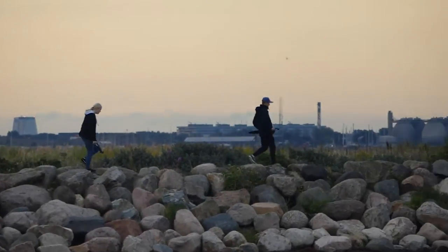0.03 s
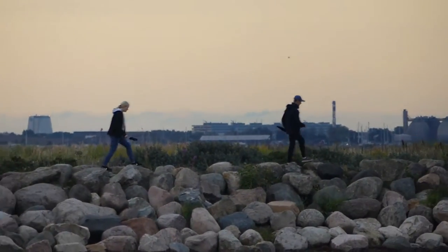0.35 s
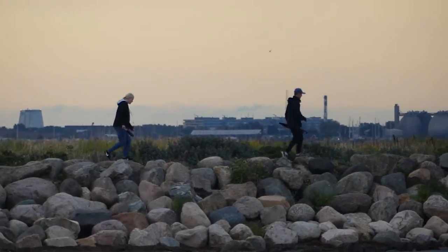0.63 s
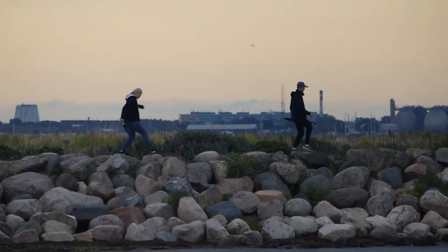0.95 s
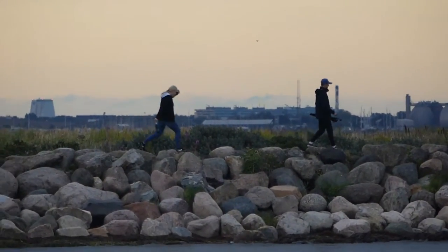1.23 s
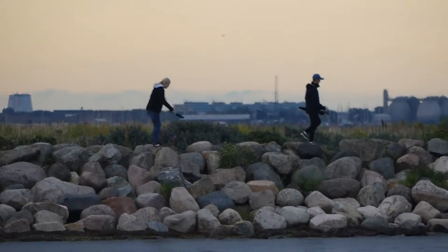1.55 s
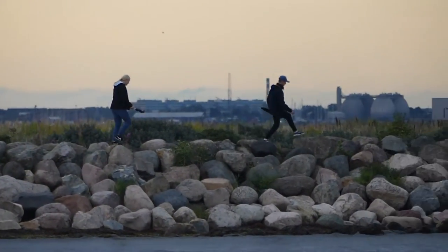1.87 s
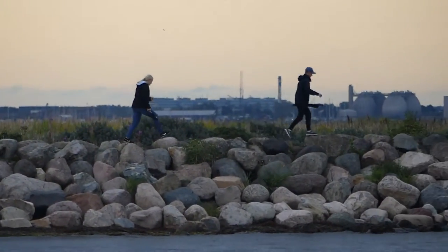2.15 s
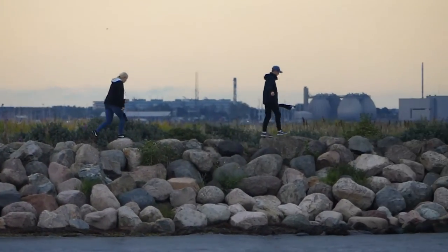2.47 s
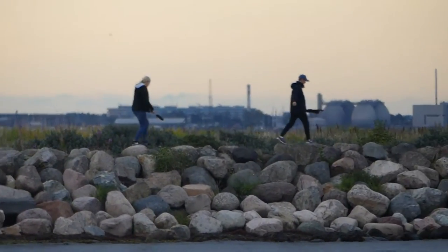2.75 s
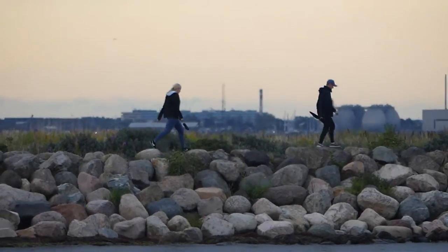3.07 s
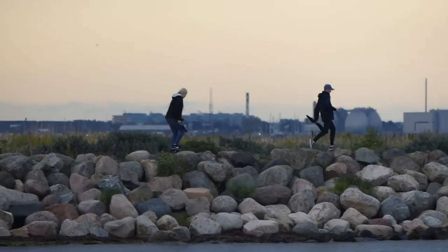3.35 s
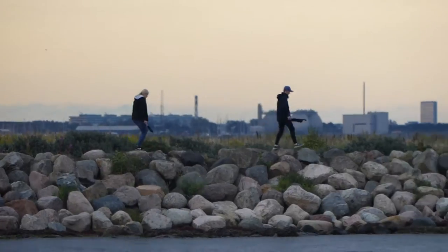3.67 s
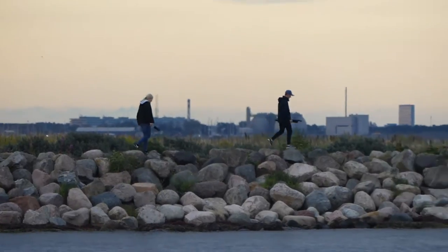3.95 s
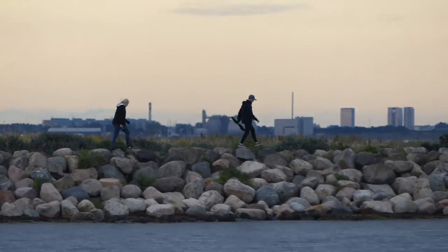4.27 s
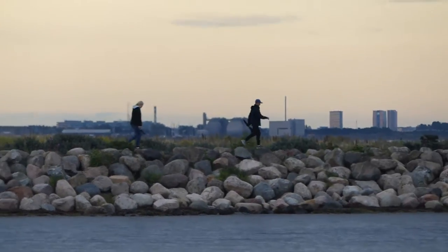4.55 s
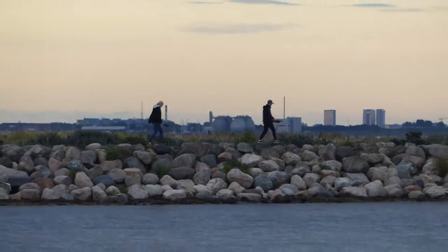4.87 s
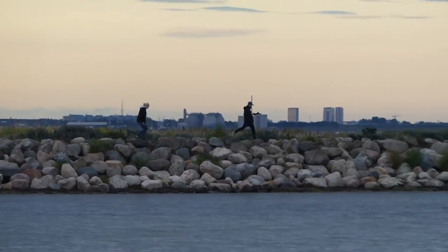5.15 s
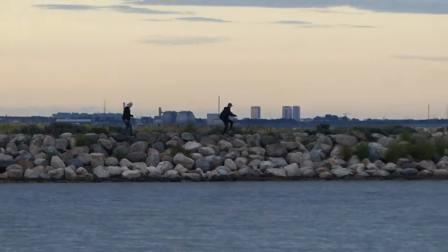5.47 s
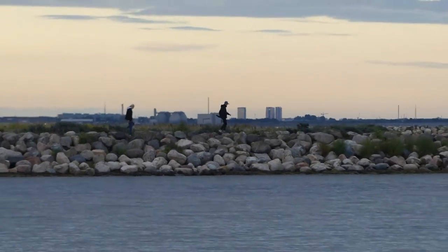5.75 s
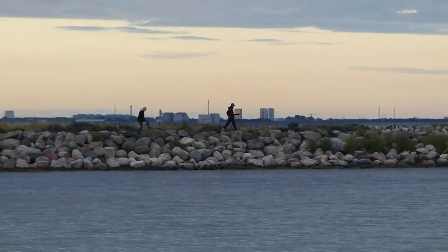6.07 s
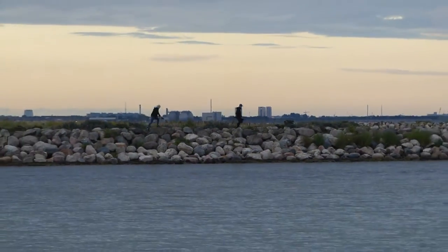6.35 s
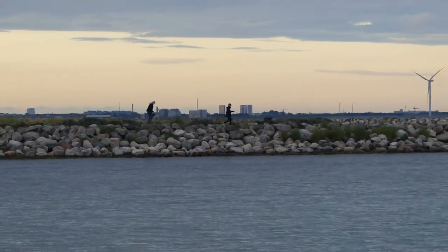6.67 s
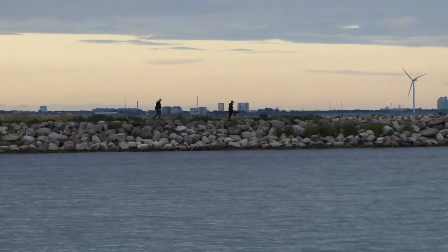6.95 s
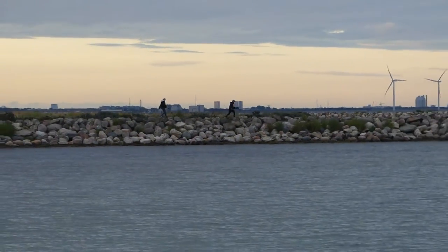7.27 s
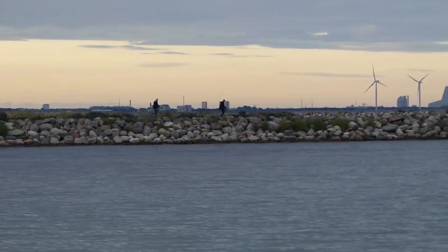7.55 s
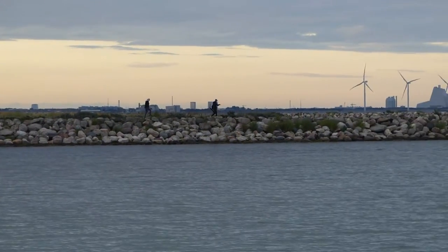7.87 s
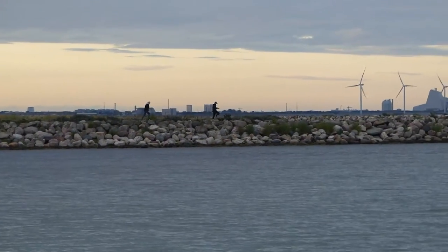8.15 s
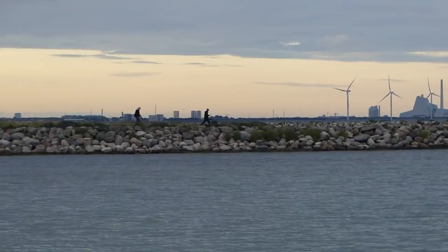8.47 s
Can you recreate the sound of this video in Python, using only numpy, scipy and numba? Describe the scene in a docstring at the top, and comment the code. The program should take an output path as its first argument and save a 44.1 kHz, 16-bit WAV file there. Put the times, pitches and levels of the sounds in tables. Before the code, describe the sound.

Gusty wind rumbles on the microphone over scattered raspy gull calls, faint lapping water and a soft zoom motor whirr.

```python
"""Gulls calling over a stony shore, heard from a hand-held camera with two microphone ports.
Each call is a creaky rasp of the syrinx; five of them break into a clear whistle in the middle.
Small waves wash the stones behind the birds. Right at the microphone, gusts buffet the ports and
sing faintly on an edge, the ports hiss, and the zoom motor ticks as the lens pulls back."""
import sys
import numpy as np
from scipy import signal
from scipy.fft import rfft, irfft, next_fast_len
from scipy.io import wavfile
from scipy.ndimage import uniform_filter1d, map_coordinates
from numba import njit

SR = 44100
rng = np.random.default_rng(int(sys.argv[2]) if len(sys.argv) > 2 else 0)


def persist_wave(psi):
    """Save psi, clipped to +-1, as 16-bit WAV."""
    counts = np.round(np.clip(psi, -1, 1) * 32767).astype(np.int16)
    wavfile.write(sys.argv[1], SR, np.atleast_2d(counts).T)


N = 379701
TIME = np.arange(N) / SR

# Water on the stones. Each row: frequency in Hz, relative density in dB.
WATER_SPECTRUM = [(150, -40), (400, 1), (560, -1), (750, 3), (1000, 3), (1300, -3), (1700, -9.5),
                  (2300, -17.5), (3200, -32.5), (5000, -30.5)]
# The slow swell of the water. Each row: time in seconds, relative level in dB.
WATER_SWELL = [(0, -47.5), (1.5, -48.5), (2.6, -48), (4.3, -51), (6.2, -51.5), (8, -51)]
# The microphone's own hiss. Each row: frequency in Hz, relative density in dB.
HISS_SPECTRUM = [(3000, 4.5), (4700, -3), (6200, 2), (7400, -4), (8500, 0.5), (9800, 4), (12500, -0.5),
                 (16000, -2)]
# Wind on the ports. Each row: frequency in Hz, relative density in dB.
WIND_SPECTRUM = [(22, -49), (35, -25), (60, -3.5), (115, 3.5), (170, 1), (250, -12.5), (350, -20),
                 (500, -32.5), (800, -52), (2000, -82)]
# Gusts at the microphone. Each row: peak time, rise and fall in seconds, relative level in dB.
WIND_GUSTS = [(0.08, 0.042, 0.076, -39.5), (1.55, 0.67, 0.96, -28.5), (2.85, 0.18, 1, -35),
              (4.38, 0.45, 0.38, -25), (5.12, 0.074, 0.21, -30.5), (5.81, 0.041, 0.036, -30.5),
              (6.08, 0.098, 0.19, -36), (6.35, 0.013, 0.063, -39.5), (7.7, 0.52, 0.49, -29),
              (8.28, 0.083, 0.067, -30.5)]
# Calls that stay creaky. Each row: peak time, rise and fall in seconds, flap rate in Hz, relative
# level in dB, beak over throat in dB, beak resonance in Hz, roughness from 0 to 1, beak gain from
# peak to end in dB, pitch glide as a share per second, throat resonance and its width in Hz,
# windpipe over throat in dB, beak width in Hz.
CREAKY_CALLS = [(0.118, 0.074, 0.071, 240, -40, -4.5, 3350, 0.57, 0, -.2, 1310, 340, -30, 1200),
                (0.187, 0.039, 0.041, 237, -38.5, -4.5, 3480, 0.6, 1, -0.15, 1320, 340, -23, 1400),
                (0.298, 0.045, 0.028, 229, -37, -7, 3460, 0.4, -2, -0.39, 1280, 260, -13, 755),
                (2.129, .012, 0.02, 230.6, -48, -2.5, 4200, 0.85, -4, 0, 1380, 380, -16, 1900),
                (2.812, 0.042, 0.048, 209, -38.5, -16.5, 2615, 0.42, 0, 0.52, 1340, 474, -30, 150),
                (2.865, 0.048, 0.13, 252.6, -44.5, -23, 4370, 0.13, -2, 0.2, 1600, 330, -31, 600),
                (3.122, 0.022, 0.015, 245.6, -46, -15, 3320, 0.2, 5, 0.16, 1450, 380, -27, 1000),
                (3.155, 0.035, 0.05, 250, -43.5, -15.5, 3920, 0.24, -6, -0.16, 1490, 380, -24, 330),
                (4.808, 0.11, 0.072, 236.4, -37.5, -3.5, 3100, 0.14, 7, -0.21, 1380, 283, -11, 360),
                (4.877, 0.037, 0.039, 231.6, -42, 1, 3350, 0.36, -3, -1.53, 1290, 300, -1, 600),
                (5.561, 0.065, 0.095, 219.7, -51, -6, 3420, 0.6, -1, 0.2, 1290, 380, -11, 700),
                (6.972, 0.047, 0.078, 233.3, -46.5, -21, 3300, 0.15, 2, 0.097, 1220, 380, -14, 470)]
# The clear whistle in each of the five cries, one list a cry. Each row: time in seconds, pitch in Hz,
# relative levels of the fundamental and of the overtones in dB.
WHISTLE_CONTOURS = [
    [(.51, 1142, -44, -57), (.53, 1119, -42, -56), (.555, 1157, -56, -44), (.578, 1199, -42, -52),
     (.595, 1184, -53, -45), (.637, 1192, -47, -44.5), (.657, 1150, -52, -55)],
    [(1.98, 1158, -43, -55), (2.02, 1130, -39.5, -52.5), (2.05, 1153, -40.5, -45.5),
     (2.085, 1141, -36.5, -47.5), (2.112, 1153, -40, -38), (2.127, 1203, -41, -60)],
    [(3.426, 1145, -51, -56), (3.455, 1143, -49, -55), (3.485, 1130, -47, -54), (3.503, 1155, -46, -71),
     (3.53, 1152, -45, -59), (3.565, 1177, -42.5, -58), (3.6, 1144, -52, -71)],
    [(5.34, 1126, -56, -70), (5.40, 1155, -45, -61.5), (5.44, 1150, -45, -59.5), (5.47, 1134, -47, -64),
     (5.492, 1093, -66, -67)],
    [(7.5, 1108, -49, -56), (7.53, 1126, -36, -47), (7.565, 1140, -38, -42), (7.595, 1144, -41.5, -43.5),
     (7.619, 1123, -40, -43.5), (7.64, 1060, -47, -52)],
]
# The voices of the same five cries. Each row: second and fourth harmonic over the third in dB,
# brightening from middle to end in dB per harmonic, tremble from 0 to 1, relative level of the
# opening rasp in dB, its rise in seconds, relative level of the closing rasp in dB.
CRY_VOICES = [(1, -43, 0.5, 0.27, -39.5, 0.055, -40.5), (-7.5, -11.5, 3.5, 0.03, -40.5, 0.037, -43),
              (0.5, -14, -3, 0.3, -43, .04, -52), (1.5, -10, -4, 0.72, -51.5, .03, -56),
              (-3, -22, 7, 0.1, -37.5, .054, -43.5)]
# The hardest single buffets. Each row: peak time in seconds, relative level in dB, pitch in Hz.
HARD_BUFFETS = [(1.243, -21.5, 190), (1.303, -18.5, 223), (1.325, -21, 170), (1.469, -18.5, 290),
                (1.637, -17.5, 157), (1.79, -16, 135), (1.805, -19, 149), (2.864, -18.5, 167),
                (3.117, -16, 151), (3.807, -17.5, 150), (4.18, -21, 210), (4.238, -21.5, 210),
                (4.303, -16.5, 175), (4.392, -18.5, 238), (4.503, -14.5, 135), (4.62, -18.5, 217),
                (6.095, -21, 160), (6.181, -19, 164), (6.365, -24.5, 124), (7.572, -18.5, 169),
                (7.968, -19.5, 152)]
# Thin edge tones in the three strongest gusts. Each row: peak time, rise and fall in seconds,
# pitch in Hz, glide in Hz per second, relative level in dB.
EDGE_TONES = [(1.38, .18, 0.46, 1900, -500, -60), (4.19, 0.071, 0.33, 1807, 1900, -59),
              (7.8, 0.3, 0.31, 1885, -500, -62.5)]
# The camera body shades the right port. Each row: frequency in Hz, left minus right in dB.
BODY_SHADE = [(110, 0), (170, -0.5), (290, 6.5), (700, 2.5), (1250, 10), (2350, 9.5), (3400, 7), (5000, 5)]


def undb(db):
    """Decibels to gain."""
    return 10 ** (np.asarray(db) / 20)


def level(x, db=0):
    """Scale to an rms level."""
    return x * undb(db) / np.sqrt(np.mean(x ** 2))


def curves(rows, t=TIME):
    """Each column of a table, joined by straight lines in time."""
    times, *columns = np.transpose(rows)
    return [np.interp(t, times, column) for column in columns]


def colour(x, points, share=1):
    """Filter by a spectrum of (Hz, dB) points, or by a share of its dB."""
    hz, db = np.transpose(points)
    size = next_fast_len(N + 4096)
    bins_hz = np.maximum(np.fft.rfftfreq(size, 1 / SR), 1)
    gain = undb(share * np.interp(np.log(bins_hz), np.log(hz), db))
    return irfft(rfft(x, size) * gain, size)[..., :N]


def noise(points):
    """Coloured noise of rms 1."""
    return level(colour(rng.standard_normal(N), points))


def walk(rate, t=TIME):
    """Smooth random drift of spread near 1, with rate new values a second."""
    return map_coordinates(rng.standard_normal(4096), [t * rate], order=3, mode="wrap")


def add(track, s, sound):
    """Mix a sound into a track from time s."""
    i = max(int(s * SR), 0)
    track[i:i + len(sound)] += sound[:N - i]


def spread(mid, side, side_db):
    """Left and right from a shared part and a side part."""
    return mid + undb(side_db) * np.array([side, -side])


def bell(peak_s, rise_s, fall_s):
    """Power that swells to 1 and dies away."""
    return np.exp(-((TIME - peak_s) / np.where(TIME < peak_s, rise_s, fall_s)) ** 2)


def hump(hz, centre_hz, width_hz, order=2):
    """Gain of a resonance; a higher order has steeper sides."""
    return (1 + 4 / order * ((hz - centre_hz) / width_hz) ** 2) ** -order


@njit
def bandpass(x, hz, width_hz):
    """State-variable band-pass with a moving centre."""
    y, band, low = np.empty(len(x)), 0., 0.
    for i in range(len(x)):
        g, damping = np.tan(np.pi * hz[i] / SR), width_hz / hz[i]
        v = (band + g * (x[i] - low)) / (1 + g * (g + damping))
        band, low, y[i] = 2 * v - band, low + 2 * g * v, damping * v
    return y


def water():
    """Behind the birds, small waves wash on the stones, swelling slowly and flickering."""
    swell = undb(curves(WATER_SWELL)[0] + .5 * walk(6.3) + 1.54 * walk(22))
    return spread(noise(WATER_SPECTRUM), noise(WATER_SPECTRUM), -7) * swell


def microphone_hiss():
    """A faint, steady hiss, partly different at each port."""
    return undb(-63) * spread(noise(HISS_SPECTRUM), noise(HISS_SPECTRUM), -3)


def wind_strength(breeze_db=-46.5):
    """Wind at the camera in dB: the gusts add up over a steady breeze."""
    gusts = sum(undb(db) ** 2 * bell(*timing) for *timing, db in WIND_GUSTS)
    return 10 * np.log10(undb(breeze_db) ** 2 + gusts)


def wind(gust_db, strong_gust_db=-33.5):
    """Large eddies rumble and small ones flap; the left channel lags in phase, widening the wind."""
    large = colour(noise(WIND_SPECTRUM), [(120, -3), (260, -13)]) * undb(1.5 * walk(38))
    small = colour(noise(WIND_SPECTRUM), [(90, -20), (220, -1)]) * undb(4.5 * walk(65))
    rumble_gain = undb(.27 * (strong_gust_db - gust_db))  # rumble grows more slowly than the wind
    eddies = (rumble_gain * large + small) / np.std(large + small)
    shared = eddies * undb(gust_db + .1) + buffets()
    side = colour(shared, [(25, -4), (60, -17.5), (130, -7.5), (280, -6)])
    lagging = np.imag(signal.hilbert(side))  # a quarter cycle behind
    unrelated = colour(noise(WIND_SPECTRUM), [(100, -16), (200, -14), (400, 4.5)]) * undb(gust_db)
    return spread(shared, lagging + unrelated, 0)


def rasp(peak_s, rise_s, fall_s, flap_hz, db, beak_db, beak_hz, rough, opening_db=0, glide=0,
         throat_hz=1290, throat_width_hz=380, windpipe_db=-13, beak_width_hz=620):
    """A gull's flapping syrinx rings its throat, windpipe and beak. Gives (start in seconds, sound)."""
    k = np.arange(3, 25)[:, None]  # harmonic numbers
    t = np.arange(-rise_s, fall_s, 1 / SR)
    clock = peak_s + t
    progress = np.interp(t, [-rise_s, 0, fall_s], [-1, 0, 1])
    arch = 1 + glide * t - 11 * t ** 2
    bend = arch * (1 + .021 * rough * walk(150, clock))
    hz = flap_hz * bend
    phase = 2 * np.pi * np.cumsum(hz) / SR
    # no two flaps are alike, so every harmonic wavers in size and phase on its own
    wavering = np.array([undb(3.4 * walk(35, clock)) + rough * (walk(200, clock) + 1j * walk(200, clock))
                         for _ in k])
    harmonics = np.real(wavering * np.exp(1j * (k * phase + .0633 * k ** 2)))
    # the throat and both beak resonances follow the pitch; the windpipe stays put
    throat = hump(k * hz, throat_hz * bend, throat_width_hz, order=1)
    windpipe = undb(windpipe_db) * hump(k * hz, 2430, 230)
    beak = hump(k * hz, beak_hz * bend, beak_width_hz)
    beak += undb(-21) * hump(k * hz, 1.3 * beak_hz * bend, 2 * beak_width_hz)
    voice = level(((throat + windpipe) * harmonics).sum(0))
    voice += level((beak * harmonics).sum(0), beak_db + opening_db * progress)  # louder when open
    swell = undb(-11 * progress ** 2) * signal.windows.tukey(len(t), .25)
    return peak_s - rise_s, undb(db) * swell * voice


def creaky_calls():
    """The gull calls that rasp from start to end."""
    out = np.zeros(N)
    for call in CREAKY_CALLS:
        add(out, *rasp(*call))
    return out


def boulder_scatter(x, wet_db=-22, t60_s=.5):
    """The boulders throw a faint, diffuse tail back to the microphone."""
    t = TIME[:SR // 2]
    tails = rng.standard_normal((2, len(t))) * np.exp(-np.log(1000) * t / t60_s)
    echoes = [signal.fftconvolve(x, tail / np.linalg.norm(tail))[:N] for tail in tails]
    return x + undb(wet_db) * np.array(echoes)


def whistle(contour, second_db, fourth_db, brighten_db, tremble, fade_s=.0055):
    """The syrinx locks into one trembling tone of four harmonics. Gives (start in seconds, sound)."""
    t = np.arange(contour[0][0], contour[-1][0], 1 / SR)
    pitch_hz, fundamental_db, third_db = curves(contour, t)
    tilt_db = brighten_db * np.linspace(-1, 1, len(t))
    phase = 2 * np.pi * np.cumsum(pitch_hz * (1 + .016 * tremble * walk(230, t))) / SR
    levels_db = [fundamental_db, third_db + second_db - tilt_db,
                 third_db, third_db + fourth_db + tilt_db]
    tone = np.zeros(len(t))
    for k, db in enumerate(levels_db, 1):
        shimmer_db = 2 * walk(45, t) + 3.5 * tremble * walk(150, t)
        tone += undb(db + shimmer_db) * np.sin(k * phase)
    fade = np.minimum(np.minimum(t - t[0], t[-1] - t) / fade_s, 1)
    return t[0], np.sqrt(2) * tone * fade


def cries(hoarse_db=-15):
    """Each cry opens with a rasp, whistles over a faint hoarseness and falls back into a softer rasp."""
    whistles, creaks = np.zeros(N), np.zeros(N)
    for contour, (*timbre, rasp_db, rise_s, closing_db) in zip(WHISTLE_CONTOURS, CRY_VOICES):
        start, end = contour[0][0], contour[-1][0]
        half = (end - start) / 2
        # the whistle sits near the fifth harmonic of the flapping
        flap_hz = .202 * np.mean([point[1] for point in contour])
        add(whistles, *whistle(contour, *timbre))
        add(creaks, *rasp(start + .004, rise_s, .031, flap_hz, rasp_db,
                          beak_db=-8.5, beak_hz=3130, rough=.47, beak_width_hz=960, windpipe_db=-13.5))
        add(creaks, *rasp(start + half, half, half, flap_hz, rasp_db + hoarse_db,
                          beak_db=-3.5, beak_hz=3270, rough=.92))
        add(creaks, *rasp(end, .024, .044, flap_hz, closing_db,
                          beak_db=-4, beak_hz=3310, rough=.51, opening_db=-7))
    return whistles, creaks


def buffets(rise_cycles=.87):
    """A strong eddy shoves the microphone diaphragms to and fro for a cycle or two."""
    out = np.zeros(N)
    for peak_s, db, hz in HARD_BUFFETS:
        cycles = hz * TIME[:SR // 10]
        age = cycles / rise_cycles
        shove = age ** 2 * np.exp(1 - age ** 2) * np.sin(2 * np.pi * cycles)
        add(out, peak_s - rise_cycles / hz, undb(db) * shove)
    return out


def edge_tones(wander=.026, width_hz=160.):
    """Strong gusts sing faintly on an edge; each tone swells, glides, levels off and fades."""
    out = np.zeros(N)
    for peak_s, rise_s, fall_s, pitch_hz, glide, db in EDGE_TONES:
        glide_hz = glide * rise_s * np.tanh((TIME - peak_s) / rise_s)
        hz = (pitch_hz + glide_hz) * (1 + wander * walk(19))
        band = bandpass(rng.standard_normal(N), hz, width_hz)
        tone = level(bandpass(band, hz, width_hz), db)  # twice, for steep sides
        out += tone * np.sqrt(bell(peak_s, rise_s, fall_s))
    return out


def zoom_motor(start_s=4.902, stop_s=7.67, step_s=.02, ramp_s=.5, tick_s=.0041, barrel_hz=822):
    """Inside the camera, each step of the lens motor rings the barrel, every other one harder."""
    t = TIME[:SR // 30]
    age = t / tick_s
    tick = age ** 2 * np.exp(2 - 2 * age) * np.sin(2 * np.pi * barrel_hz * t)
    out = np.zeros(N)
    for k, s in enumerate(np.arange(start_s, stop_s, step_s)):
        size, late = rng.standard_normal(2)
        soft_start_db = -14 * max(1 - (s - start_s) / ramp_s, 0)
        db = -42 + soft_start_db + 2.5 * size - 4 * (k % 2)
        add(out, s + .00017 * late, undb(db) * tick)
    return out


def scene():
    """Gulls, wind, water and motor reach the two ports, the right one shaded by the camera body."""
    whistles, creaks = cries()
    gulls = boulder_scatter(undb(-4) * (creaky_calls() + creaks) + whistles)
    left, right = gulls + wind(wind_strength()) + water() + edge_tones() + zoom_motor()
    ports = np.array([colour(left, BODY_SHADE, 1 / 2), colour(right, BODY_SHADE, -1 / 2)])
    return ports + microphone_hiss()


def record(dry, low_cut_hz=32, knee_db=-29, top_hz=15600):
    """The camera cuts the deepest rumble, turns its gain down a little in loud gusts and cuts the top."""
    x = signal.sosfilt(signal.butter(2, low_cut_hz, "high", fs=SR, output="sos"), dry)
    power = uniform_filter1d(np.mean(x ** 2, axis=0), size=SR // 3)
    gain = (1 + power / undb(knee_db) ** 2) ** -.2
    return signal.sosfilt(signal.ellip(10, .1, 70, top_hz, fs=SR, output="sos"), x * gain)


dry = scene()
out = record(dry)
persist_wave(out)
```